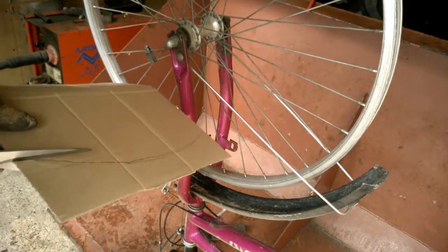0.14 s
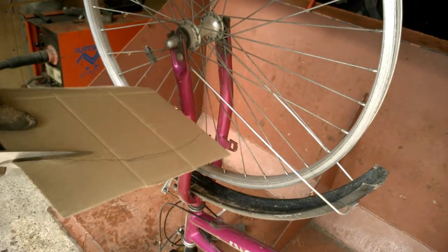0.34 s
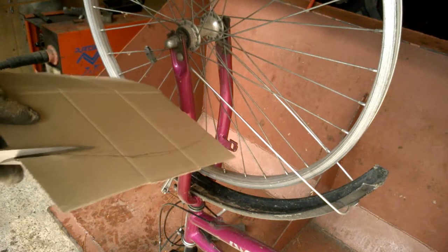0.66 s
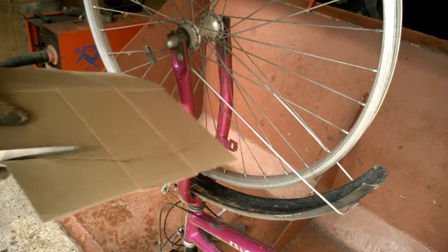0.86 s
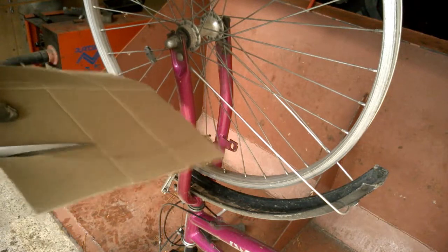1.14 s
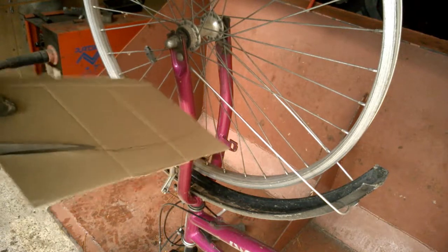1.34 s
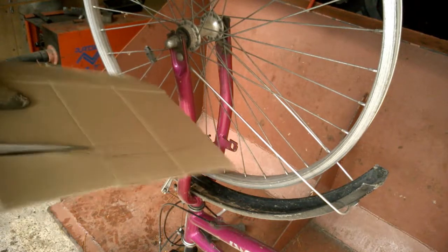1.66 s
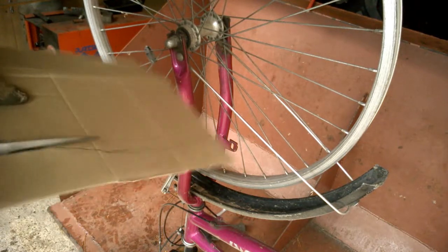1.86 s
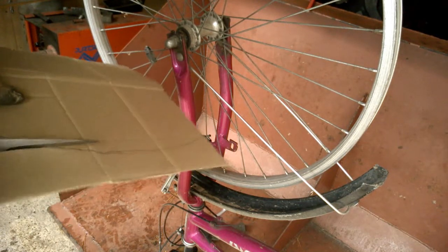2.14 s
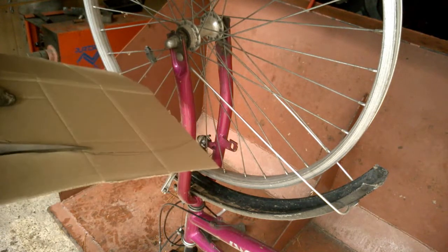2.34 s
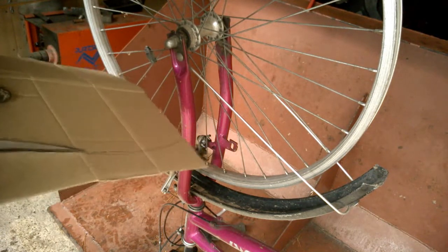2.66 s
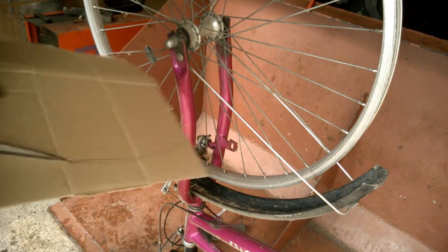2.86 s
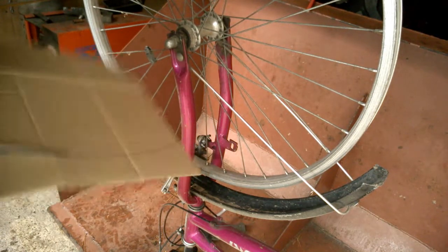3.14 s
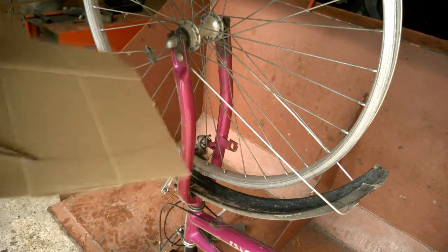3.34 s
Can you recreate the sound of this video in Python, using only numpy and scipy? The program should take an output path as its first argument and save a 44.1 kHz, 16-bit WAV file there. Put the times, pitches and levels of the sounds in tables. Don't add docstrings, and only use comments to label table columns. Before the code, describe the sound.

Close, dry scissor cuts in a cardboard sheet, unevenly spaced; each tears crisply, snaps and makes the panel boom briefly. Paper rubs between cuts, a tiny pivot squeak occurs midway, and faint room air lies behind.

```python
import sys
import numpy as np
from scipy import signal
from scipy.fft import rfft, irfft
from scipy.io import wavfile

SR = 44100
rng = np.random.default_rng(int(sys.argv[2]) if len(sys.argv) > 2 else 0)


def transcribe(u):
    v = np.clip(np.atleast_2d(u).T, -1, 1)
    q = np.round(v * 32767).astype(np.int16)
    wavfile.write(sys.argv[1], SR, q)


def boost_factor(decibels):
    exponent = np.asarray(decibels, float) / 20
    return 10 ** exponent


N = 154350
TIME = np.arange(N) / SR

# (f/Hz, level/dB)
TEAR_SPECTRUM = [(880, -7), (1500, -5), (1920, -3), (5380, -4.5), (6120, 2.5), (8660, -3.5), (11700, -3.5),
                 (16000, -13)]
# (f/Hz, level/dB, time to fall 60 dB/s)
SHEET_MODES = [(500, -14, .035), (580, -1, .08), (635, -1, .06), (710, -3, .04), (820, -3, .04),
               (940, -7, .035), (1080, -6, .04), (1400, -9, .05), (1920, -6, .055), (2300, -11, .03)]
# (f/Hz, level/dB, time to fall 60 dB/s)
FLEX_MODES = [(62, -2, .16), (82, -8, .1), (128, 0, .12), (163, -3, .14), (222, -10, .12)]
# (f/Hz, level/dB, time to fall 60 dB/s)
BEND_MODES = [(205, -2, .06), (280, -1, .05), (350, -1, .04), (430, -2, .04)]


def noise():
    return rng.standard_normal(N)


def rms_one(x):
    return x / np.sqrt(np.mean(x ** 2) + 1e-20)


def colour(x, points, skirt_db=40):
    hz, db = np.transpose(points)
    log_f = np.log(np.maximum(np.arange(2049) * SR / 4096, 5))
    below = np.clip(np.log(hz[0]) - log_f, 0, 1)
    above = np.clip(log_f - np.log(hz[-1]), 0, 1)
    shape_db = np.interp(log_f, np.log(hz), db) - skirt_db * (below + above)
    cepstrum = irfft(np.log(boost_factor(shape_db)))
    cepstrum[1:2048] *= 2
    cepstrum[2049:] = 0
    response = irfft(np.exp(rfft(cepstrum)))
    return signal.fftconvolve(x, response / np.sqrt(np.sum(response ** 2)))[:N]


def body(x, modes):
    t = TIME[:SR // 2]
    response = np.zeros(len(t))
    for k, (hz, db, t60) in enumerate(modes):
        fade = boost_factor(db - 60 * t / t60) / np.sqrt(t60)
        response += (-1) ** k * fade * np.sin(2 * np.pi * hz * t)
    span_hz = [.8 * modes[0][0], 1.3 * modes[-1][0]]
    response = signal.sosfilt(signal.butter(2, span_hz, "band", fs=SR, output="sos"), response)
    return signal.fftconvolve(x, response / np.sqrt(np.sum(response ** 2)))[:N]


def drift(rate_hz):
    r = np.exp(-2 * np.pi * rate_hz / SR)
    wander = signal.lfilter([1], [1, -2 * r, r * r], rng.standard_normal(N + SR))
    return rms_one(wander[SR:])


def grains(spread_db):
    grains_per_s = 12000
    sizes = boost_factor(spread_db * np.minimum(rng.exponential(1, N), 5)) * rng.choice([-1, 1], N)
    return rms_one(sizes * (rng.random(N) < grains_per_s / SR))


def stroke(s, db):
    inside = np.clip(np.minimum(TIME - s[0], s[-1] - TIME) / 0.006 + .5, 0, 1)
    return inside * boost_factor(np.interp(TIME, s, db))


def burst(s, db, rise, fall):
    t = TIME - s
    return boost_factor(db) * np.clip(t / rise, 0, 1) * np.exp(-np.clip(t - rise, 0, 1) / fall)


def background():
    # (f/Hz, level/dB)
    air_spectrum = [(12, -31), (20, -1), (52, 1), (113, -7.5), (574, -11.5), (1660, -21.5), (4420, -28),
                    (12400, -34.5), (16000, -29.5)]
    # (t/s, level/dB)
    traffic = [
        (0, -2),
        (.6, 4),
        (1.0, 9.5),
        (1.4, 4),
        (1.9, 4.5),
        (2.3, -3.5),
        (2.8, 1),
        (3.5, 3),
    ]
    air_db, rumble_db, rumble_hz = -61.5, -57.5, (27.4, 53)
    band = signal.butter(2, rumble_hz, "band", fs=SR, output="sos")
    low = signal.sosfilt(band, rng.standard_normal(N + SR))[SR:]
    rumble_gain = boost_factor(rumble_db + np.interp(TIME, *np.transpose(traffic)))
    air = colour(noise(), [p for p in air_spectrum if p[0] > 80]) * boost_factor(drift(6.0))
    return boost_factor(air_db) * air + rumble_gain * rms_one(low)


def workshop(x):
    room_db, room_t60_s, wall_cut_hz = -21, 0.31, 1770
    t = TIME[:SR // 2]
    tail = rng.standard_normal(len(t)) * boost_factor(-60 * t / room_t60_s)
    tail *= t > .005
    tail = signal.lfilter(*signal.butter(1, wall_cut_hz, fs=SR), tail)
    return boost_factor(room_db) * signal.fftconvolve(x, tail / np.sqrt(np.sum(tail ** 2)))[:N]


def squeak():
    # (t/s, peak level/dB)
    slips = [
        (2.0844, -74),
        (2.112, -63),
        (2.122, -69),
        (2.1335, -43),
        (2.1398, -37),
        (2.164, -64),
        (2.177, -59),
        (2.192, -60),
        (2.221, -28.5),
    ]
    gain = stroke((2.132, 2.165), [-70, -70])
    for s, db in slips:
        gain = gain + burst(s, db - 13.0, 0.00026, .002)
    modes = [(hz, 0, .01) for hz in (5600, 6200, 6900)]
    ringing = body(gain * grains(3.0), modes)
    return colour(ringing, [(5000, -20), (5700, 0), (6800, -2), (7800, -18)], 8)


def patchy(x):
    patchy_db = 3.5
    edges = np.geomspace(400, 19000, 12)
    total = np.zeros(N)
    for pair in zip(edges, edges[1:]):
        band = signal.sosfilt(signal.butter(1, pair, "band", fs=SR, output="sos"), x)
        total += band * boost_factor(patchy_db * drift(20.3))
    return 0.45 * total


def contact(gains, rows, spread_db, spectrum, skirt_db):
    # (f/Hz, level/dB)
    rasp_spectrum = [(500, -10), (1200, 0), (2000, -3), (3200, -2.5), (6000, -10)]
    rasp = sum(gain * boost_factor(row[3]) for gain, row in zip(gains, rows))
    shake = sum(gain * boost_factor(row[4]) for gain, row in zip(gains, rows))
    direct = colour(sum(gains) * grains(spread_db), spectrum, skirt_db)
    direct = direct + colour(rasp * grains(spread_db), rasp_spectrum)
    return patchy(direct) + body(shake * grains(spread_db), SHEET_MODES), shake


def slides():
    # (middle t/s, half length/s, level/dB, rasp/dB, shaking of the sheet/dB)
    rubs = [(0.034, 0.031, -41.5, -15, -21), (0.593, 0.061, -63, 6, -5), (0.724, 0.066, -68, 6.5, -10),
            (0.807, 0.031, -38, -22, -19), (0.855, 0.038, -36.5, -17, -26),
            (0.921, 0.049, -37.5, -15.5, -27), (0.968, 0.031, -44.5, 0, -16), (1.112, 0.037, -64, -9, -16),
            (1.43, 0.029, -44, -7, -36), (1.575, 0.037, -43, -3, -18), (1.683, 0.029, -31.5, -0.5, -16.5),
            (1.734, 0.078, -41, -3, -14.5), (1.79, 0.029, -50, 4, -8), (2.034, 0.027, -46.5, 0.5, -22),
            (2.702, 0.04, -55.5, -2, 0.5), (2.779, 0.019, -63, 10.5, 5.5), (2.885, 0.027, -62.5, 7.5, 4.5),
            (2.957, 0.017, -39, -7.5, -17), (3.01, 0.066, -47.5, -2, -3.5), (3.232, 0.036, -55, 10.5, 12.5),
            (3.265, 0.032, -35, -3, -9.5), (3.323, 0.029, -52, 1, 4.5), (3.406, 0.037, -51, 0.5, -1.5),
            (3.5, 0.031, -46.5, -1.5, -8)]
    # (f/Hz, level/dB)
    hiss_spectrum = [(880, -69), (1500, -17), (2910, -16.5), (3180, -11.5), (3590, -7.5), (4780, -7.5),
                     (9850, -6.5), (12900, -8), (16000, -15.5)]
    flutter_db, spread_db, bend_db = 0.5, 1.5, -6
    fade_db, flatness = 14, 2.2
    flutter = boost_factor(flutter_db * drift(61.0))
    gains = []
    for middle, half, db, _, _ in rubs:
        distance = np.abs((TIME - middle) / half)
        gains.append(flutter * boost_factor(db - fade_db * distance ** flatness))
    sound, shake = contact(gains, rubs, spread_db, hiss_spectrum, 3.1)
    return sound + body(boost_factor(bend_db) * shake * noise(), BEND_MODES)


def rings():
    # (t/s, f/Hz, peak level/dB, time to fall 60 dB/s)
    panels = [(0.326, 69.4, -34, 0.061), (.333, 590, -28, 0.04), (.333, 848, -38.5, 0.1),
              (.34, 231, -42.5, 0.13), (.41, 889, -49, 0.11), (.415, 217, -45.5, 0.17),
              (0.564, 214, -51, 0.13), (0.944, 2010, -47, 0.16), (1.146, 75, -31, 0.061),
              (1.148, 670, -42.5, 0.046), (1.149, 960, -38.5, 0.039), (1.165, 110, -34, 0.097),
              (1.19, 130, -29, 0.12), (1.193, 908, -34, 0.043), (1.212, 70, -31, .08),
              (1.24, 151, -22, 0.088), (1.24, 560, -27.5, 0.021), (1.241, 1080, -37.5, 0.17),
              (1.251, 80.6, -20.5, 0.041), (1.274, 498.5, -34.5, 0.066), (1.287, 167, -42, 0.07),
              (1.551, 565, -50, 0.07), (1.649, 203, -49, 0.081), (1.67, 649, -40, .08),
              (1.67, 1310, -46.5, 0.21), (1.72, 1080, -44, 0.19), (1.775, 1360, -40.5, 0.085),
              (1.79, 507, -45, 0.11), (2.248, 685, -26, 0.044), (2.253, 56, -30.5, 0.14),
              (2.25, 1962, -30.5, 0.051), (2.285, 2126, -49.5, 0.23), (2.274, 158, -34, 0.11),
              (2.427, 158, -35.5, 0.15), (2.43, 627, -43, 0.065), (2.48, 166, -27.5, 0.074),
              (2.479, 618, -19.5, 0.043), (2.479, 1350, -29, 0.066), (2.479, 1884, -20, 0.033),
              (2.488, 71, -30.5, .08), (2.52, 618, -37, 0.092), (2.665, 588, -45, 0.18),
              (3.03, 584, -40, 0.12), (3.085, 720, -31.5, 0.067), (3.123, 598, -24, 0.035),
              (3.123, 2035, -27.5, 0.025), (3.172, 50, -39, 0.13), (3.176, 589, -28.5, 0.025),
              (3.302, 284, -43, 0.1), (3.39, 810, -44, .06)]
    rise, wobble_db = 0.025, 3
    out = np.zeros(N)
    for s, hz, db, t60 in panels:
        t = np.clip(TIME - s, 0, 1)
        swell = 1 - np.exp(-t / (rise * t60))
        out += boost_factor(db + 3 - 60 * t / t60) * swell * np.sin(2 * np.pi * hz * t)
    return out * boost_factor(wobble_db * drift(90.0))


def ticks():
    # (t/s, peak level/dB)
    breaks = [(0.317, -31), (0.403, -28), (0.411, -36), (0.788, -16), (1.281, -14), (1.2994, -30),
              (1.3254, -49), (1.3405, -29.5), (1.9775, -56), (2.3196, -20.5), (2.558, -27), (2.688, -27),
              (2.7764, -37.5), (2.8727, -36), (3.018, -10), (3.0298, -18.5), (3.1233, -3), (3.1475, -28),
              (3.4123, -23), (3.4472, -27), (3.4805, -37)]
    tick_s, tick_db = 0.00029, -10
    gain = sum(burst(s, db + tick_db, tick_s / 2, tick_s) for s, db in breaks)
    return colour(gain * rng.choice([-1, 1], N), [(1200, -8), (5000, -3), (10000, 0), (15500, -9)])


def cuts():
    # (start t/s, hold/s, level/dB, rasp/dB, shaking of the sheet/dB)
    tears = [(0.293, 0.068, -46, -20, -3.5), (0.317, 0.027, -39.5, -31, -22), (0.339, 0.064, -54.5, -8, 8),
             (0.404, 0.028, -54, -12, 5.5), (1.137, 0.023, -35, -39, -7.5),
             (1.186, 0.094, -35.5, -20, -6.5), (1.248, 0.066, -42.5, 8, 1), (2.215, 0.059, -35.5, -1, -9.5),
             (2.242, 0.025, -36, 8.5, -12.5), (2.421, 0.12, -38.5, -4.5, -3), (2.476, 0.088, -39, 9, 2.5),
             (3.02, 0.088, -32.5, -7, -15.5), (3.061, 0.028, -36.5, -2.5, -5.5), (3.116, 0.054, -41, 7, 0)]
    flutter_db, spread_db, flex_db, bend_db = 1, 4, -19.5, -4.5
    rise_s, sag_db_per_s, let_go_db_per_s = 0.0097, 172, 408
    flutter = boost_factor(flutter_db * drift(113.0))
    gains = []
    for s, hold, db, _, _ in tears:
        t = TIME - s
        sag_db = sag_db_per_s * np.clip(t, 0, hold)
        let_go_db = let_go_db_per_s * np.clip(t - hold, 0, 1)
        gains.append(flutter * np.clip(t / rise_s, 0, 1) * boost_factor(db - sag_db - let_go_db))
    sound, shake = contact(gains, tears, spread_db, TEAR_SPECTRUM, 2.9)
    flexing = body(boost_factor(flex_db) * shake * noise(), FLEX_MODES)
    bending = body(boost_factor(bend_db) * shake * noise(), BEND_MODES)
    return sound + flexing + bending


def snaps():
    # (t/s, peak level/dB, length/s, sheet/dB, flex/dB)
    flutes = [(0.3327, -21.5, 0.0058, -25, -4), (0.399, -38, 0.011, -15, 11), (1.115, -42, 0.016, -3, -25),
              (1.143, -25, 0.0083, -13, -18), (1.196, -27.5, 0.002, 5, -11), (1.2156, -33, 0.005, -14, -1),
              (1.2377, -13.5, 0.0085, -7, -11), (1.285, -39, 0.0047, -8, -28), (2.218, -31, 0.0098, -7, 8),
              (2.2336, -26, 0.0043, 1.5, -2.5), (2.248, -10.5, 0.007, -14, -23),
              (2.274, -18.5, 0.0039, -15, -6.5), (2.4325, -30, 0.0013, 5, -8),
              (2.4812, -5.5, 0.0032, -12.5, -13.5), (3.087, -24.5, 0.017, -3.5, -15)]
    # (t/s, peak level/dB, pulse width/s)
    knocks = [
        (2.998, -34, 0.00077),
        (3.124, -16.5, 0.0001),
        (3.1751, -22, 0.0004),
    ]
    # (f/Hz, level/dB, time to fall 60 dB/s)
    blade_modes = [(3470, -3, .025), (4610, -5, .025), (6050, -5, .02), (7450, -9, .02)]
    spread_db, snap_db, blade_db, sheet_gain_db, flex_gain_db = 2, -8, -5.5, 3, -3
    knock_db, knock_direct_db, knock_cut_hz = -6, 1.5, 200
    snap = sheet = flex = 0
    for s, db, length, sheet_db, flex_db in flutes:
        one = burst(s, db + snap_db, .5 * length, 0.58 * length)
        snap = snap + one
        sheet = sheet + one * boost_factor(sheet_db)
        flex = flex + one * boost_factor(flex_db)
    crack = snap * grains(spread_db)
    heard = colour(crack, TEAR_SPECTRUM, 13.0)
    blades = boost_factor(blade_db) * body(crack, blade_modes)

    knock = sum(boost_factor(db) * np.exp(-((TIME - s) / width) ** 2) for s, db, width in knocks)
    sheet_push = boost_factor(sheet_gain_db) * sheet * grains(spread_db) - boost_factor(knock_db) * knock
    knock_click = signal.lfilter(*signal.butter(2, knock_cut_hz, "high", fs=SR), knock)
    flexing = body(boost_factor(flex_gain_db) * 10 * np.gradient(flex), FLEX_MODES)
    return heard + blades + body(sheet_push, SHEET_MODES) - boost_factor(knock_direct_db) * knock_click + flexing


def scene():
    near = squeak() + slides() + rings() + ticks() + cuts() + snaps()
    return (near + workshop(near) + background())[None, :]


def roll_off(x):
    return signal.sosfilt(signal.butter(12, 16640, fs=SR, output="sos"), x)


def record(dry):
    rounded = .8 * np.tanh(dry / .8)
    mix = signal.sosfilt(signal.cheby2(12, 60, 16400, fs=SR, output="sos"), rounded)
    return roll_off(mix)


dry = scene()
out = record(dry)
transcribe(out)
```